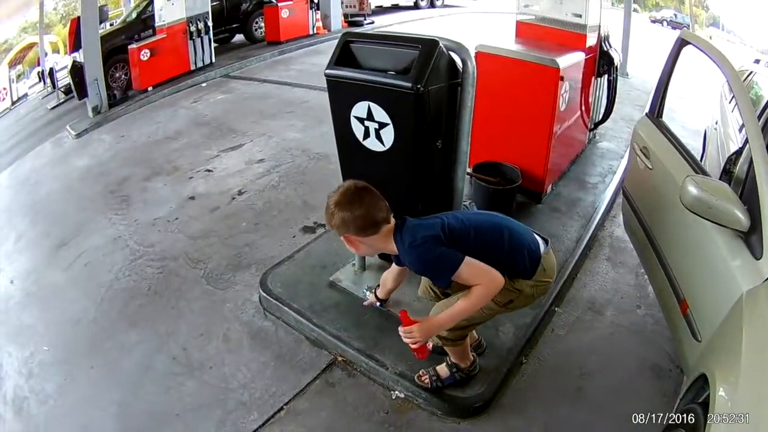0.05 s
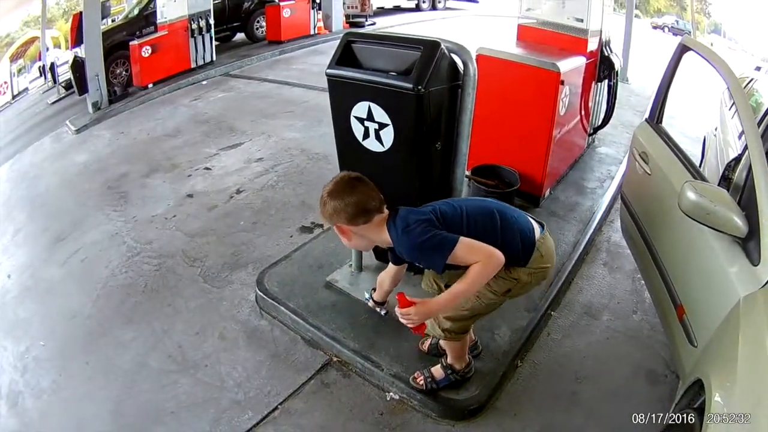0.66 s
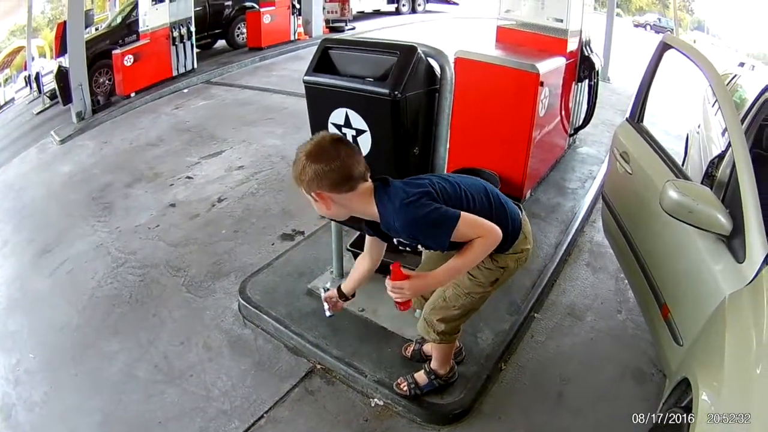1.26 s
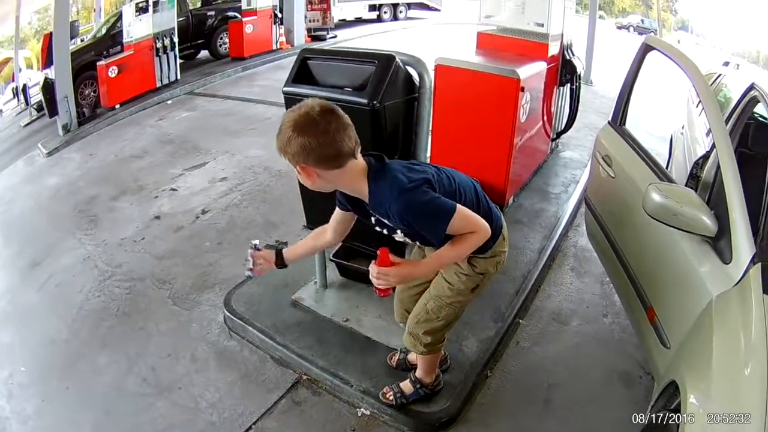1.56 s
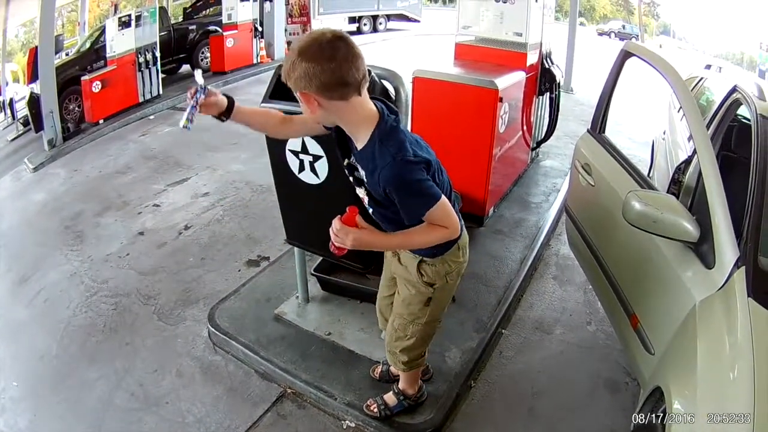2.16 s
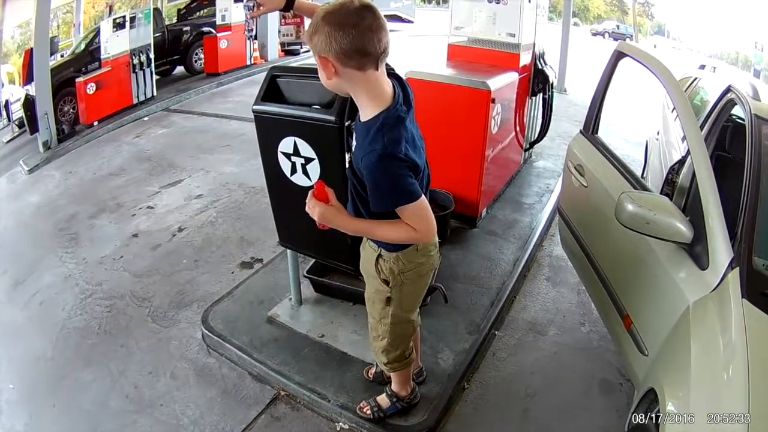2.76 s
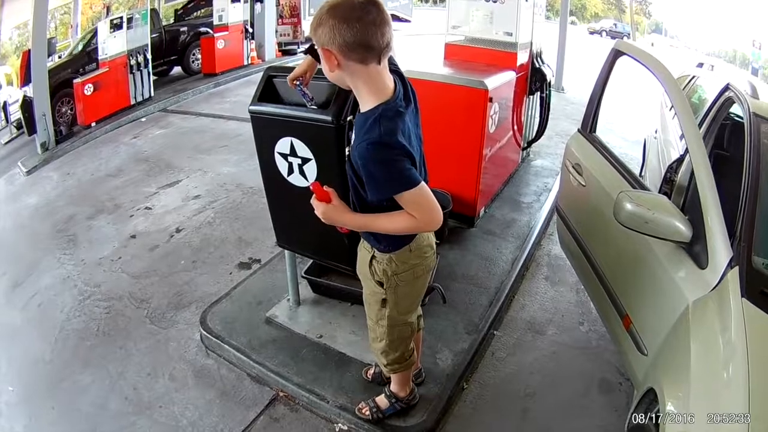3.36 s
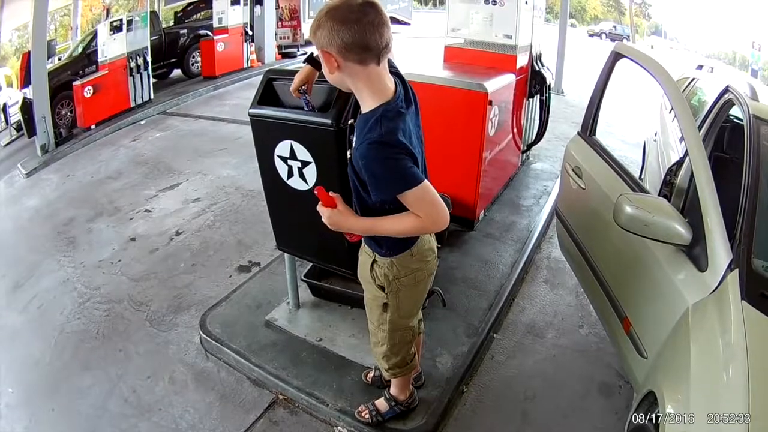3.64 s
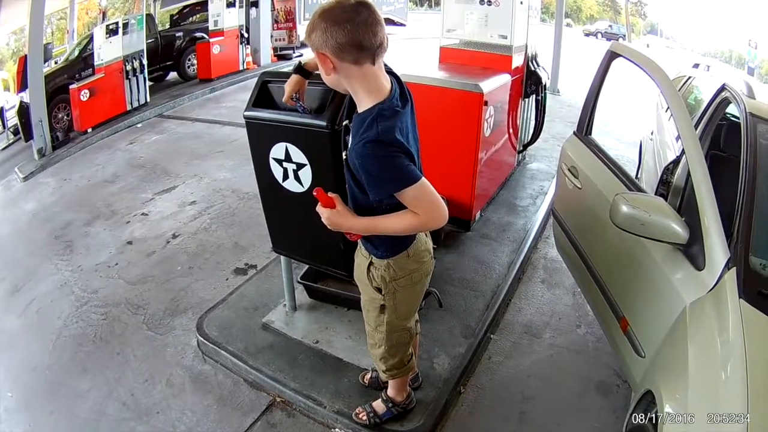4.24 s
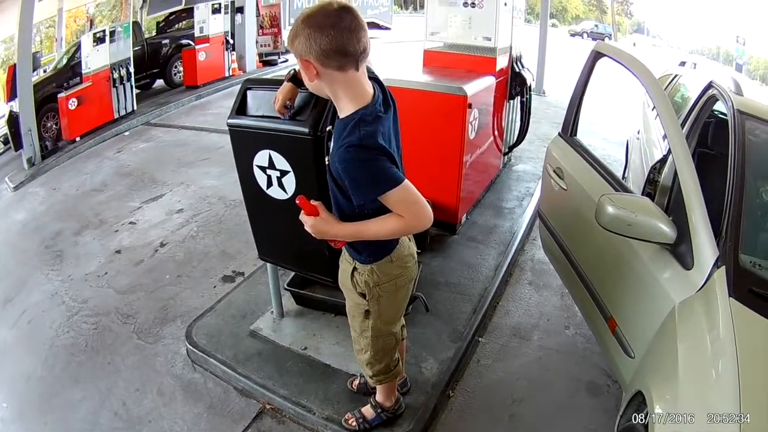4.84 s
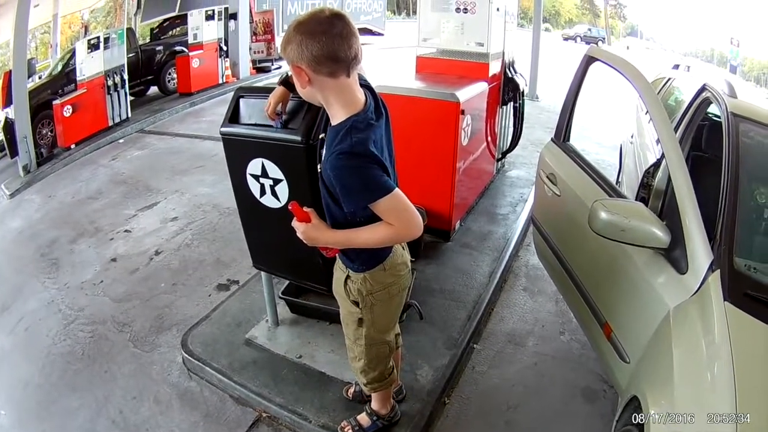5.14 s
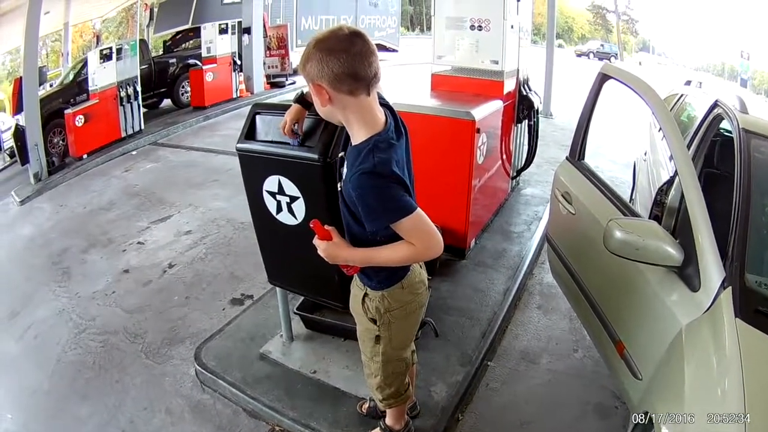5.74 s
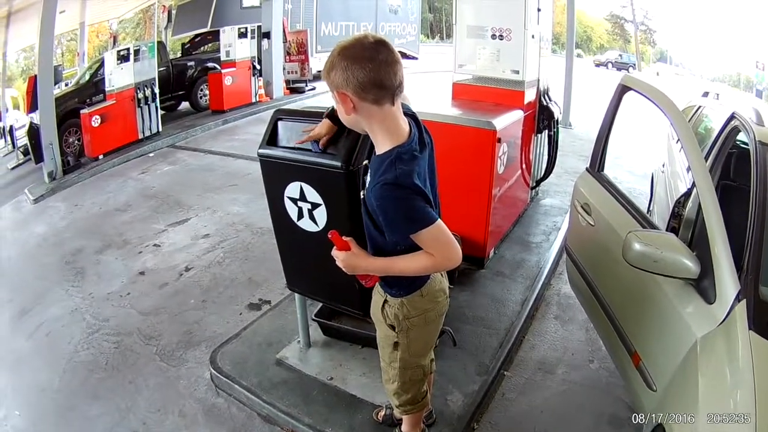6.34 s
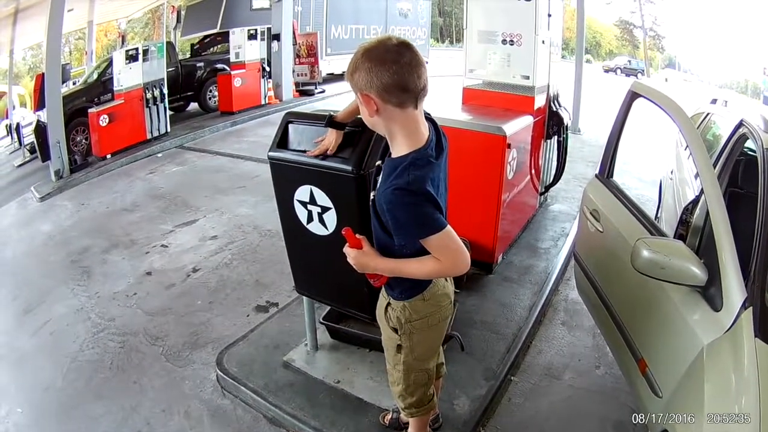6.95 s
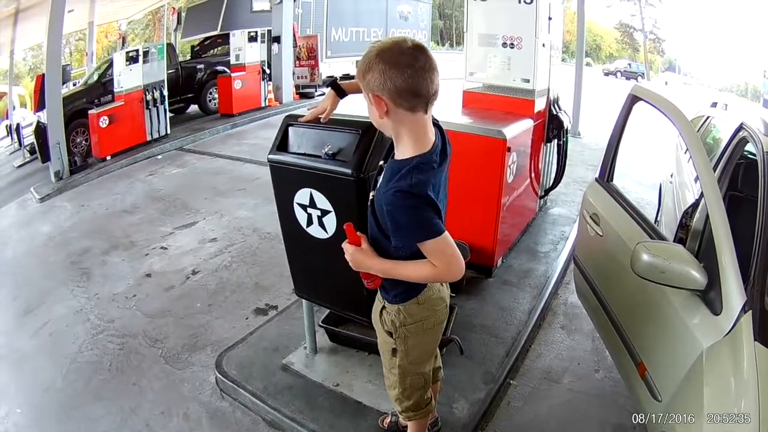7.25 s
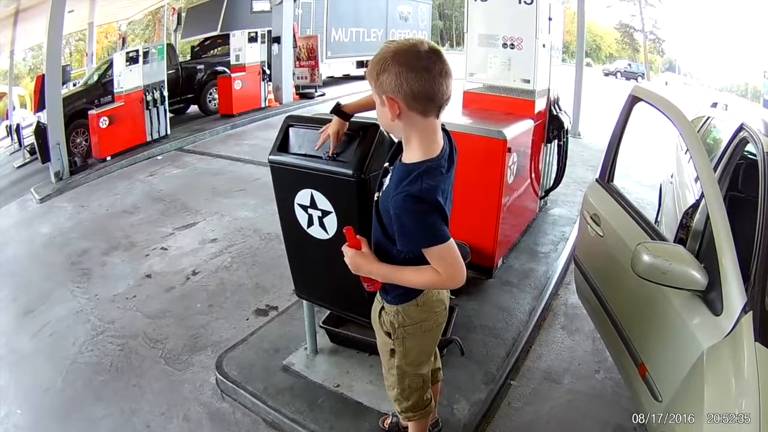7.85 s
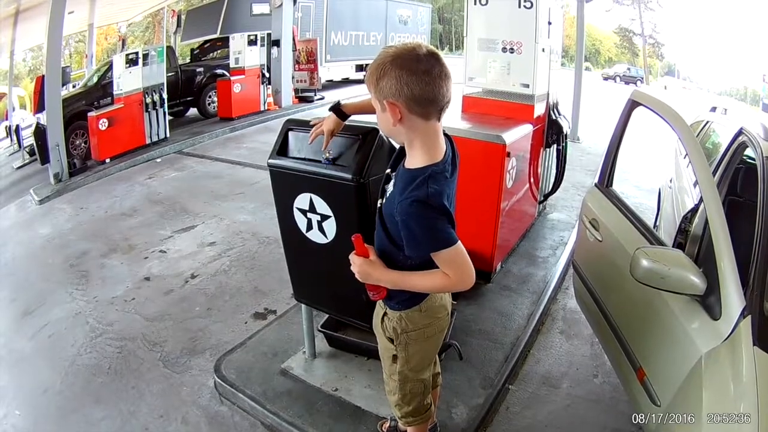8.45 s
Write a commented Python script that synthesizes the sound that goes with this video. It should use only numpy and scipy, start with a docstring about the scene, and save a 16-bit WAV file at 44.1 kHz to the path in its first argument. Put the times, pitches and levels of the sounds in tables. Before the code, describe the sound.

Traffic rumbles steadily around a covered petrol station, with the low hum of two idling engines and a very faint pump whirr. About halfway through, the hinged flap of a plastic bin near the microphone knocks as it is pushed, then clatters back a moment later. Rubbish lands inside with a soft thud. The canopy adds a short echo, and the rumble carries on to the end.

```python
"""Steady traffic rumble and two idling engines beating against each other, under a petrol station canopy.
Pumps whirr faintly. The hinged flap of a plastic bin knocks as it is pushed and clatters as it swings
back, ringing the bin's modes. Rubbish lands in the liner with a soft thud; later a finger ticks the flap.
The canopy echoes the bin."""
import sys
import numpy as np
from scipy import signal
from scipy.fft import rfft, irfft, next_fast_len
from scipy.io import wavfile
from scipy.ndimage import map_coordinates

SR = 44100
rng = np.random.default_rng(int(sys.argv[2]) if len(sys.argv) > 2 else 0)


def wav_record(signal):
    """Record a signal, one row per channel, as 16-bit PCM in the file named by sys.argv[1]."""
    frames = np.transpose(np.atleast_2d(signal))
    bounded = np.clip(frames, -1, 1)
    # unit amplitude maps onto the largest positive 16-bit level
    quanta = np.round(bounded * 32767).astype(np.int16)
    wavfile.write(sys.argv[1], SR, quanta)


N = 383669

# traffic roar, two swells: t/s, level/dB
TRAFFIC_LEVEL = [(0, -39), (3.4, -36), (4.05, -37.5), (5.0, -37), (6.05, -39.4), (7.6, -37.6), (8.2, -40.5),
                 (8.7, -40.5)]
# background noise spectra: f/Hz, density/dB
RUMBLE_SPECTRUM = [(10, -25.5), (24, -4), (36, 1.5), (62, 1), (100, -1), (160, -2.5), (210, -8), (270, -15),
                   (500, -24), (1200, -74.5)]
ROAR_SPECTRUM = [(120, -18), (290, -9.5), (400, -5.5), (500, -3), (570, 0.5), (680, -4), (800, -12.5),
                 (1020, -18), (1300, -28), (1700, -35), (2050, -35.5), (2500, -41), (3050, -46),
                 (3900, -65)]
HISS_SPECTRUM = [(1000, -4), (3700, -2), (4400, -2), (6000, -3), (7200, -1), (8200, 2.5), (9300, -2.5),
                 (9800, -9)]
# pump whirr: f/Hz, width/Hz, level/dB
PUMP_BANDS = [(1878, 63, 0), (2019, 260, 0)]
# far engine swells: start/s, end/s, level/dB
FAR_ENGINE_SWELLS = [(0, .75, -37.5), (1.6, 4.0, -39), (7.2, 8.1, -43.5)]
# canopy echo decay: f/Hz, t60/s
CANOPY_DECAY = [(150, 0.74), (600, 0.75), (2000, 0.72), (6000, 0.16)]
# finger, rubbish and bin panel noise spectra: f/Hz, density/dB
FINGER_SPECTRUM = [(900, -15), (1800, 4), (2700, -2), (3300, -12), (4200, -39)]
RUSTLE_SPECTRUM = [(70, -23.5), (140, 0), (260, 3), (400, 0.5), (600, -12), (1000, -17), (1500, -32.5),
                   (2100, -35.5), (3300, -48.5), (4500, -69)]
CLATTER_SPECTRUM = [(40, -26), (130, -19), (330, 3.5), (560, 8), (880, -2), (1100, -8.5), (1500, -24),
                    (1900, -15.5), (2400, -25), (3100, -29.5), (3600, -41), (4000, -49.5), (6000, -46.5),
                    (7500, -77)]
# rubbish impacts: t/s, boom/dB, rustle/dB
RUBBISH_LANDINGS = [(4.991, -15.5, -30), (5.026, -45, -30.5), (5.085, -48, -34.5), (5.209, -46, -34.5)]
# bin and flap modes: f/Hz, t60/s, level struck at open stop/dB, level struck at rim/dB
BIN_MODES = [(140, .25, -27, -8), (196, .25, -7, -24), (234, .14, -8, -8), (330, .17, -5, -13),
             (398, .3, -6, -14), (490, .2, -15, -1), (547, .25, -9, -9), (588, .25, -8, -13),
             (678, .3, -16, -19), (718, .2, -21, -10), (853, .27, -19, -13), (877, .2, -15, -17),
             (912, .25, -19, -12), (1100, .16, -24, -20), (1220, .16, -29, -26), (1815, .17, -33, -26),
             (1890, .2, -36, -28), (1992, .17, -34, -25), (2157, .2, -42, -27)]
# flap impacts: t/s, ring/dB, clatter/dB, clatter tilt/(dB/octave), place (0 open stop, 1 rim)
FLAP_CONTACTS = [(4.524, -40.5, -21.5, -5, 0.35), (4.529, -17.5, -26, -0.5, 0),
                 (4.596, -42.5, -26.5, -6, 0.23), (4.853, -16.5, -24, -4.5, 1),
                 (4.858, -47.5, -26.5, 1, 0.8), (4.869, -50, -23.5, 0.5, 0.93),
                 (4.886, -47, -29, 0.5, 0.85)]


def amp(db):
    """Decibels to gain."""
    return 10 ** (np.asarray(db) / 20)


def unit_rms(x):
    """Scale to rms 1."""
    return x / np.sqrt(np.mean(x ** 2) + 1e-20)


def log_interp(points, hz):
    """Read (f/Hz, value) points on a log axis."""
    points_hz, values = np.transpose(points)
    return np.interp(np.log(hz + 1), np.log(points_hz + 1), values)


def wobble(rate_hz, size=N):
    """Smooth random curve, knots at rate_hz."""
    knots = rng.standard_normal(int(size * rate_hz / SR) + 4)
    return map_coordinates(knots, [np.arange(size) * rate_hz / SR])


def filtered(x, gain_at_hz):
    """Zero-phase FFT filter."""
    size = next_fast_len(len(x) + 8192)
    return irfft(rfft(x, size) * gain_at_hz(np.fft.rfftfreq(size, 1 / SR)), size)[:len(x)]


def noise(spectrum, size=N, tilt_db_per_oct=0):
    """Shaped noise, rms 1."""
    gain = lambda hz: amp(log_interp(spectrum, hz) + tilt_db_per_oct * np.log2(hz + 1))
    return unit_rms(filtered(rng.standard_normal(size), gain))


def envelope(t, attack_s, t60_s):
    """Quick rise, exponential decay."""
    return (1 - np.exp(-t / attack_s)) * np.exp(-np.log(1000) * t / t60_s)


def add(track, start_s, sound):
    """Mix sound into track."""
    part = track[round(start_s * SR):][:len(sound)]
    part += sound[:len(part)]


def hiss():
    """Faint, even microphone hiss."""
    return amp(-78) * noise(HISS_SPECTRUM)


def pumps():
    """Pumps whirr in two narrow noise bands."""
    gain = lambda hz: sum(amp(db) / (1 + (2 * (hz - centre_hz) / width_hz) ** 2)
                          for centre_hz, width_hz, db in PUMP_BANDS)
    return amp(-68 + 0.64 * wobble(3.4)) * unit_rms(filtered(rng.standard_normal(N), gain))


def traffic(ebb_db_per_s=0.17):
    """The roar of passing traffic swells; the rumble follows it and slowly ebbs."""
    t = np.arange(N) / SR
    roar_db = np.interp(t, *np.transpose(TRAFFIC_LEVEL))
    mean_db = roar_db.mean()
    rumble_db = mean_db + 1.1 * (roar_db - mean_db) - ebb_db_per_s * (t - t.mean())
    rumble = amp(rumble_db + 0.65 * wobble(5.4)) * noise(RUMBLE_SPECTRUM)
    roar = amp(roar_db + 0.35 * wobble(7)) * noise(ROAR_SPECTRUM)
    return rumble + roar


def engine(firing_hz, level_db, waver_hz, waver_db, overtone_db):
    """Muffled exhaust: a wavering firing tone and a weak octave."""
    phase = 2 * np.pi * np.cumsum(firing_hz + waver_hz * wobble(4)) / SR
    tone = np.sin(phase) + amp(overtone_db) * np.sin(2 * phase)
    return amp(level_db + waver_db * wobble(8.6)) * unit_rms(tone)


def engines(sag_hz_per_s=0.93, far_idle_hz=41.2, ramp_s=0.3, lull_db=-53.5):
    """One engine steady, one slowing to idle: they beat in each swell, faster as the pitches part."""
    t = np.arange(N) / SR
    far_hz = np.maximum(47.5 - sag_hz_per_s * t, far_idle_hz)
    swells_db = [np.interp(t, [start_s - ramp_s, start_s, end_s, end_s + ramp_s], [lull_db, db, db, lull_db])
                 for start_s, end_s, db in FAR_ENGINE_SWELLS]
    near = engine(firing_hz=52.6, level_db=-37, waver_hz=0.12, waver_db=0.6, overtone_db=-25)
    far = engine(far_hz, np.max(swells_db, axis=0), waver_hz=0.23, waver_db=0.3, overtone_db=-12)
    return near + far


def canopy_echo(x, delay_s=0.018):
    """Reflections off roof and pumps; treble dies first."""
    hz, t, spectra = signal.stft(rng.standard_normal(SR), SR, nperseg=256)
    decay = np.exp(-np.log(1000) * t / log_interp(CANOPY_DECAY, hz)[:, None])
    _, tail = signal.istft(spectra * decay, SR, nperseg=256)
    delayed = np.pad(x, (round(delay_s * SR), 0))
    return signal.fftconvolve(delayed, tail / np.linalg.norm(tail))[:N]


def finger_tick(start_s=7.809, level_db=-59):
    """A finger meets the flap too softly to ring the bin."""
    out, t = np.zeros(N), np.arange(SR // 2) / SR
    tick = noise(FINGER_SPECTRUM, len(t)) * envelope(t, attack_s=0.004, t60_s=0.18)
    add(out, start_s, amp(level_db) * tick)
    return out


def rubbish(air_hz=136):
    """The liner cushions the fall: the bin's air booms softly under a dull rustle."""
    out, t = np.zeros(N), np.arange(SR) / SR
    for start_s, boom_db, rustle_db in RUBBISH_LANDINGS:
        liner_flex_rad = 0.4 * wobble(45, len(t))
        boom = np.sin(2 * np.pi * air_hz * t + liner_flex_rad) * envelope(t, attack_s=0.022, t60_s=0.28)
        rustle = noise(RUSTLE_SPECTRUM, len(t)) * envelope(t, attack_s=0.0027, t60_s=0.28)
        add(out, start_s, amp(boom_db) * boom + amp(rustle_db) * rustle)
    return out


def flap():
    """Each contact rings the bin's modes, weighted by strike place, over a short panel clatter."""
    out, t = np.zeros(N), np.arange(SR // 2) / SR
    for start_s, ring_db, clatter_db, tilt_db_per_oct, place in FLAP_CONTACTS:
        for hz, t60_s, stop_db, rim_db in BIN_MODES:
            rattle_rad = 0.2 * wobble(110, len(t))  # the loose flap smears each mode
            mode_db = ring_db + np.interp(place, [0, 1], [stop_db, rim_db])
            mode = np.sin(2 * np.pi * hz * t + rattle_rad) * envelope(t, attack_s=0.001, t60_s=t60_s)
            add(out, start_s, amp(mode_db) * mode)
        clatter = noise(CLATTER_SPECTRUM, len(t), tilt_db_per_oct)
        add(out, start_s, amp(clatter_db) * clatter * envelope(t, attack_s=0.0026, t60_s=0.16))
    return out


def scene():
    """Bin and echo over the forecourt background, mono."""
    knocks = flap() + rubbish() + finger_tick()
    return (knocks + amp(-12) * canopy_echo(knocks) + engines() + traffic() + pumps() + hiss())[None]


def record(dry):
    """Steep low-pass band limit."""
    stop_hz, rolloff_hz = 10072, 400
    lowpass = lambda hz: np.clip((stop_hz - hz) / rolloff_hz, 0, 1)
    return np.array([filtered(channel, lowpass) for channel in dry])


dry = scene()
out = record(dry)
wav_record(out)
```